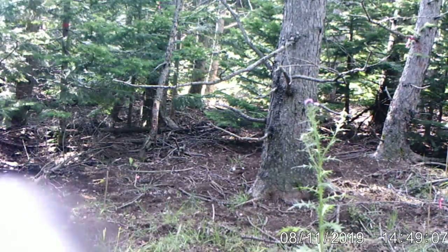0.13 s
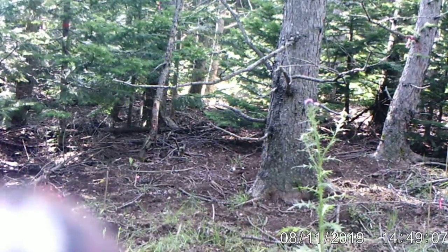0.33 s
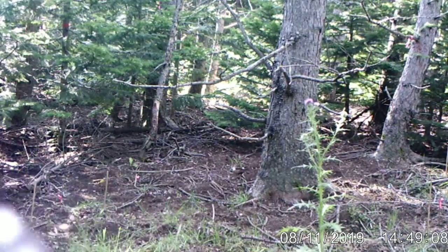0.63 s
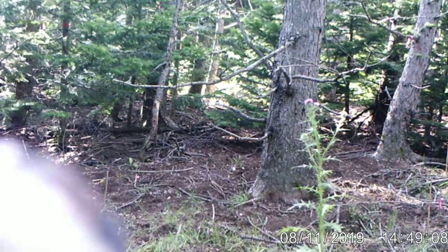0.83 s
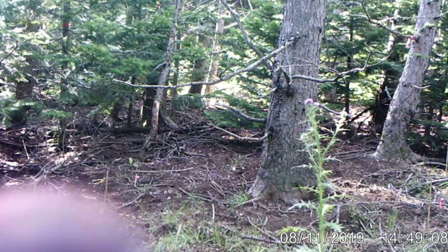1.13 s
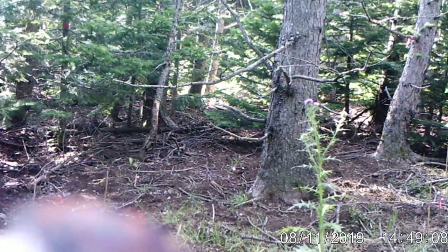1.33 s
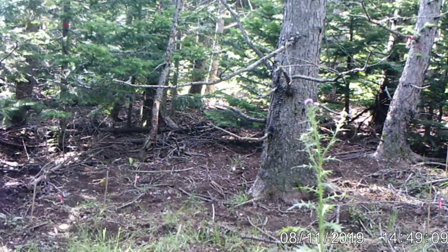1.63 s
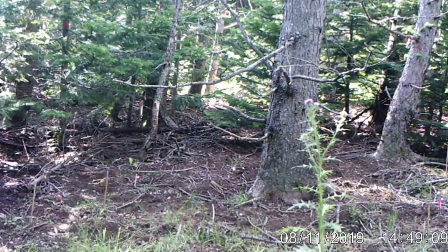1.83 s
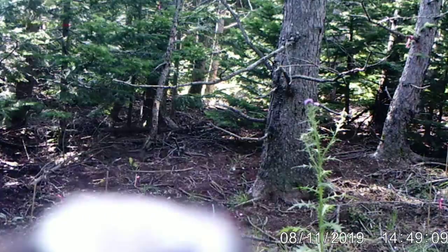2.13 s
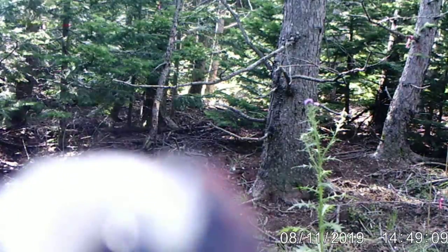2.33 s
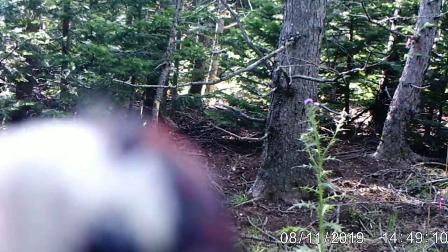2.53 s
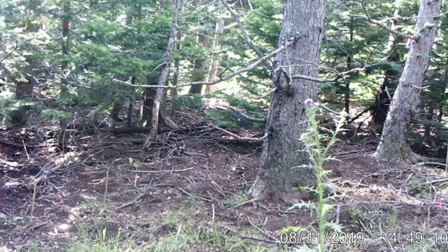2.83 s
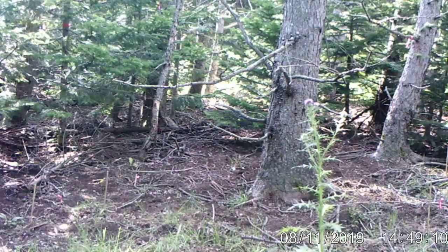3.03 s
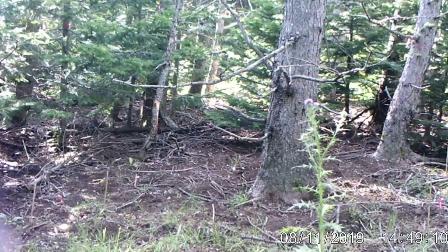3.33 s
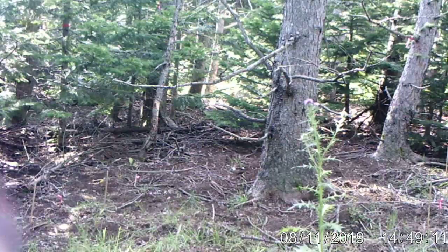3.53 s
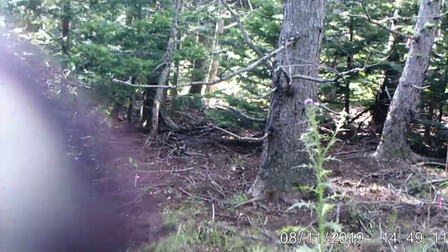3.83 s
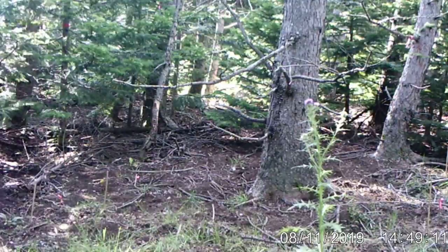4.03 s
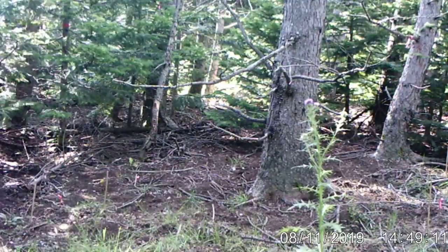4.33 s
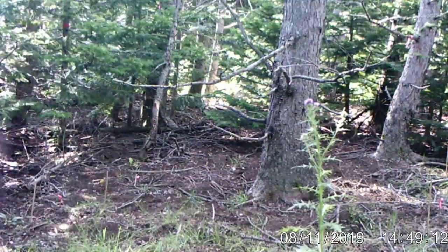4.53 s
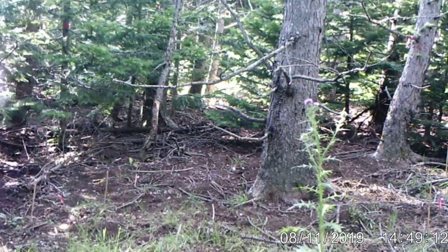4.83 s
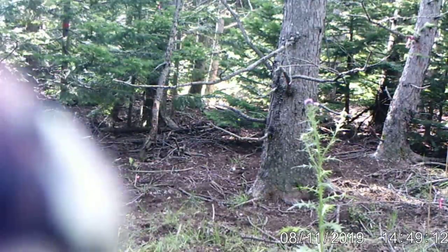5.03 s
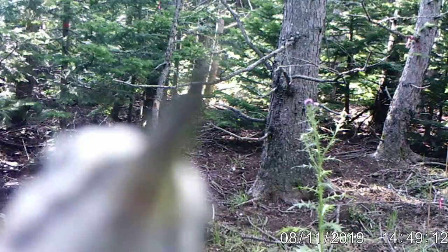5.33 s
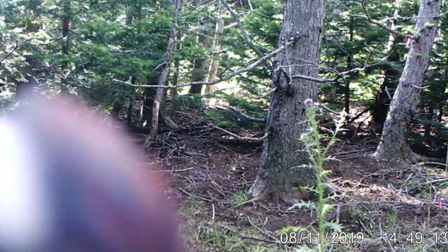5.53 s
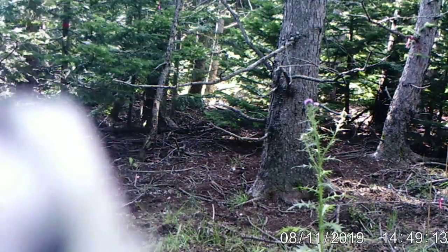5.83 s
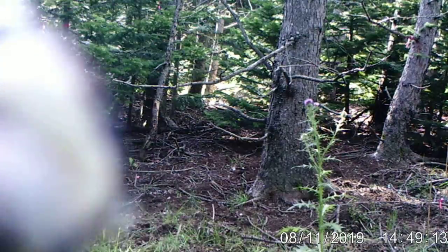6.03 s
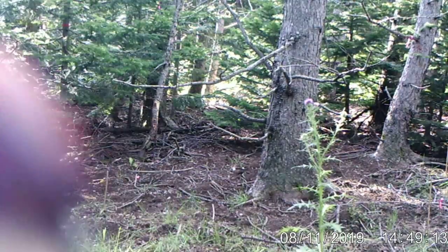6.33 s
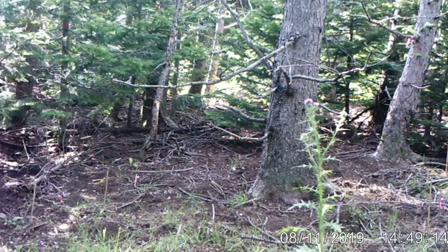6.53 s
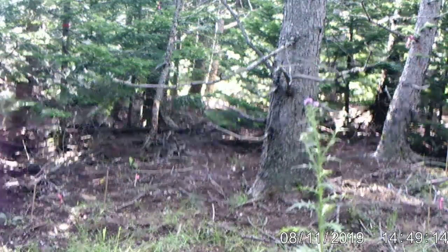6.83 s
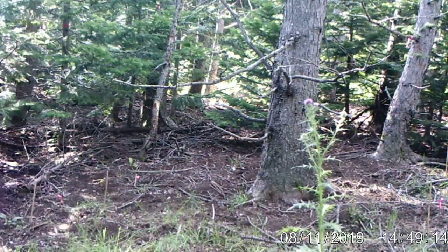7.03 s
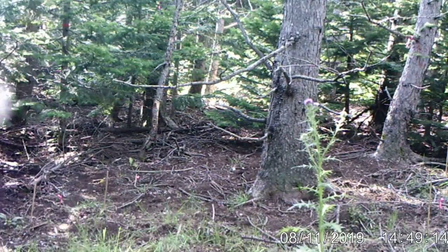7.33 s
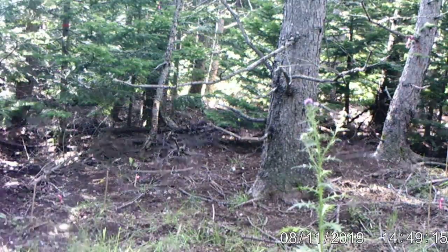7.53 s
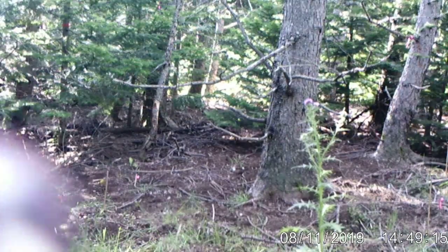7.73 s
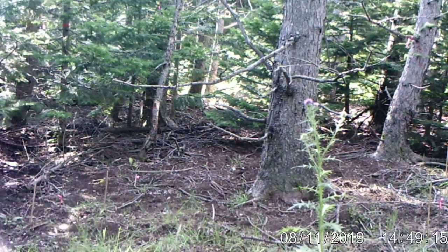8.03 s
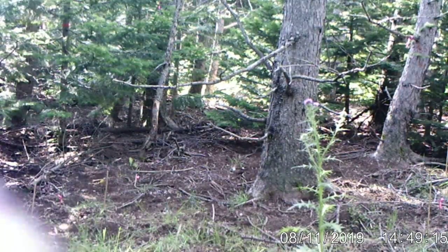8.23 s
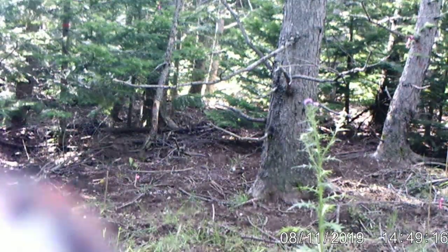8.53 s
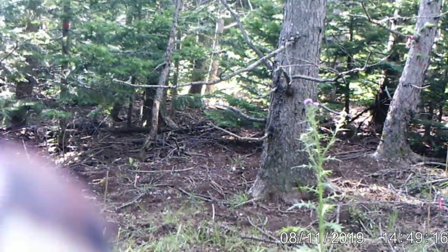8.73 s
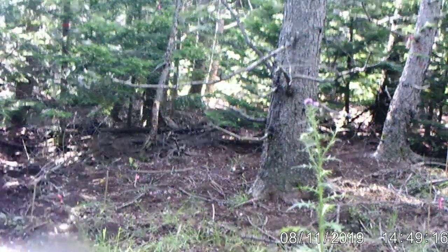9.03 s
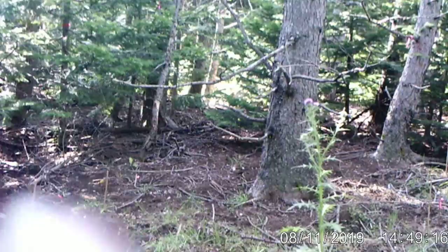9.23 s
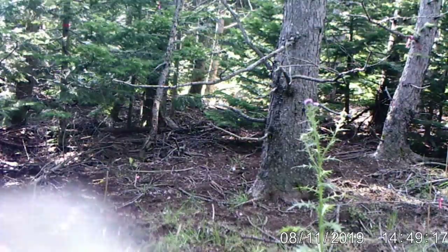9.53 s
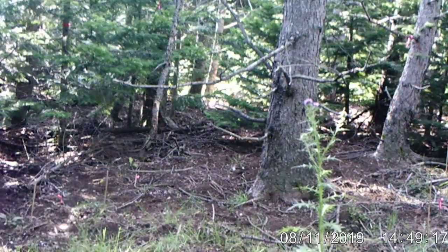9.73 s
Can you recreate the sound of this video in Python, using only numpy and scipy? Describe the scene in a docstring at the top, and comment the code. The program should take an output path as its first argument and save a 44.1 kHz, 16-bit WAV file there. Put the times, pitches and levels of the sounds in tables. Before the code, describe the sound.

A woodpecker hammers on a hollow plastic case right at the microphone, loud clipped knocks in uneven runs with rattling, light taps and claw scrapes.

```python
"""Quiet forest: a woodpecker on a plastic trail camera hammers on it in short, uneven runs, over a faint hiss.
Each peck rings the modes of the housing and clips at the microphone; the loose case rebounds and chatters.
Between pecks, light contacts of beak and claws ring the same modes.
Claw creaks, scrapes and bill wipes are trains of uneven slips, coloured by the plastic.
"""
import sys
import numpy as np
from scipy import signal
from scipy.fft import rfft, irfft
from scipy.io import wavfile

SR = 44100
rng = np.random.default_rng(int(sys.argv[2]) if len(sys.argv) > 2 else 0)


def dump_mix(stems):
    """Bounce the given channels to the path in sys.argv[1] as a 16-bit WAV at rate SR."""
    frames = np.atleast_2d(stems).T  # one column per channel
    limited = np.clip(frames, -1, 1)  # hard clip at full scale
    pcm = np.round(limited * 32767).astype(np.int16)
    wavfile.write(sys.argv[1], SR, pcm)


N = 436590
T_S = np.arange(SR // 5) / SR  # time after one contact

# Pecks: t/s, flex level/dB, knock centre f/Hz, crack level/dB, thump gain/dB, sway/dB, settle t/s
# sway: rocking of the case on its mount, 0 dB = full blow; settle: time at which rocking is halved
PECKS = [(0.1711, -11.5, 1350, -13.5, -27, 0.5, 0.061), (0.5233, -9.5, 1493, -12, -17, -2, 0.073),
         (0.713, -13.5, 1318, -13.5, -29, -1.5, 0.079), (1.446, -22.5, 1118, -18, -54, -12, 0.07),
         (2.0522, -13.5, 1530, -19, -22, -16, 0.08), (2.3783, -17, 1510, -23.5, -42, -33, 0.047),
         (2.7092, -13.5, 1410, -15, -16, -7.5, 0.065), (2.8684, -10, 1410, -11.5, -19.5, -5.5, 0.072),
         (3.1986, -13, 1030, -13.5, -6, -4, 0.16), (3.6739, -14.5, 1310, -13, -23, -11.5, 0.069),
         (3.8501, -13, 1410, -15, -28.5, 0, 0.079), (4.4307, -12.5, 1543, -22, -32, 0.5, 0.095),
         (4.6353, -10, 1500, -16.5, -25, 0.5, 0.14), (6.2509, -9.5, 1577, -15.5, -16, -14, 0.031),
         (6.2565, -11, 1627, -15, -16.5, -12.5, .037), (6.5123, -24.5, 1430, -25.5, -46, -38, 0.08),
         (6.6471, -16, 1500, -28.5, -44, -12, 0.1), (6.813, -11, 1450, -16.5, -19.5, -1.5, 0.081),
         (7.5096, -15.5, 1440, -19, -19.5, -3, .1), (7.685, -12.5, 1516, -18.5, -25, 1, 0.074),
         (8.0942, -9.5, 1090, -24.5, -13.5, -0.5, 0.084), (8.272, -8.5, 1581, -13, -36, -1.5, 0.097),
         (8.4433, -13, 1360, -18.5, -20.5, -0.5, 0.13), (8.8311, -12.5, 1530, -13.5, -29.5, 1, 0.11),
         (8.9868, -8, 1260, -20.5, -13, 1, 0.067), (9.158, -11.5, 1500, -19, -23, -4, 0.11),
         (9.5432, -11, 1444, -19, -14.5, -1, 0.1), (9.7058, -17, 1320, -21.5, -46, -4, 0.06)]
# Clearest light taps of beak and claws: t/s, knock level/dB, click level/dB
TAPS = [(0.164, -43, -40), (1.06, -37.5, -36.5), (1.89, -61, -52), (1.93, -55, -44), (2.011, -49, -50.5),
        (2.298, -28.5, -34.5), (2.662, -55.5, -48), (2.845, -65.5, -41.5), (3.175, -47.5, -26),
        (3.185, -41.5, -27.5), (3.25, -24, -30), (3.274, -45, -32), (3.292, -39, -17),
        (3.331, -34.5, -26.5), (3.342, -39, -34), (3.552, -46.5, -42), (3.574, -49, -31), (3.58, -32, -27),
        (4.069, -66, -53.5), (4.4, -48.5, -38), (4.425, -52, -33), (4.587, -47, -36), (4.624, -48, -29.5),
        (4.802, -65, -48.5), (5.028, -54, -44.5), (5.162, -64, -50.5), (5.546, -29.5, -37.5),
        (6.213, -53, -41.5), (6.229, -52.5, -38), (6.302, -33, -39), (6.347, -57, -47.5),
        (6.41, -68, -52.5), (6.628, -58, -32), (6.797, -49.5, -25), (7.637, -41, -25.5),
        (7.677, -34.5, -27), (7.796, -31.5, -23.5), (7.827, -31, -23), (7.891, -56, -37.5),
        (7.985, -40, -30.5), (8.973, -46, -27), (9.135, -71, -39.5), (9.509, -49, -37),
        (9.672, -46.5, -28.5)]
# Claws dragging over the case: t/s, length/s, body drive/dB, rasp drive/dB
SCRAPES = [(0.662, 0.01, -45.5, -49), (0.995, 0.11, -52, -54.5), (1.114, 0.024, -45, -46),
           (3.216, 0.11, -42.5, -32.5), (3.288, 0.025, -62, -27), (3.409, 0.031, -49.5, -52),
           (3.572, 0.015, -34, -42), (3.598, 0.022, -48, -36.5), (6.7, 0.098, -53.5, -67),
           (7.615, 0.05, -37, -29), (7.692, 0.062, -57, -23), (7.773, 0.1, -58, -32.5),
           (7.904, 0.016, -39, -47), (7.921, 0.2, -57, -46)]
# Spells of shifting grip: start t/s, end t/s, drive/dB
SHUFFLES = [(1.522, 1.574, -56), (3.353, 3.464, -57), (3.535, 3.676, -58.5), (4.933, 5.167, -57.5),
            (7.218, 7.25, -50.5)]
# Bending modes of the housing walls, before detuning and damping: f/Hz, level/dB, t60/s
WALL_MODES = [(844, -4, .028), (922, -9.5, 0.055), (1072, -4, 0.025), (1213, -6.5, 0.026),
              (1240, -10.5, .018), (1457, 1, 0.014), (1660, 2, .03), (1870, -10, 0.004)]
# Stiff modes of the front plate, before detuning and damping: f/Hz, level/dB, t60/s
PLATE_MODES = [(2198, 1.5, 0.028), (2823, -1, 0.014), (3010, 1.5, 0.0023), (3090, -0.5, 0.019),
               (3180, -9.5, 0.054), (3480, 1.5, 0.01), (4120, -15.5, 0.007), (3694, -2.5, 0.014),
               (4500, -3, 0.058), (5300, -5, 0.035), (4810, -4, 0.031)]
# Long resonances of the back shell, fed by blows and loose parts: f/Hz, width/Hz, level/dB
SHELL_MODES = [(230, 61, -7), (384, 22, -3.5), (1252, 14, -7.5), (2070, 110, -1.5), (3070, 7, -10),
               (4480, 7, -11), (4950, 7, -13)]
# Case falling back onto its mount, before scatter and settling: delay t/s, level at 0 dB sway/dB
BOUNCES = [(0.0225, -18), (0.035, -31), (0.05, -32.5), (0.056, -35), (0.068, -32.5), (0.081, -40.5),
           (0.094, -37)]
# Colour of the chattering case: f/Hz, relative level/dB
RATTLE_COLOUR = [(60, -32.5), (200, -19.5), (290, -23), (410, -5.5), (650, -13.5), (900, 2), (1400, 1.5),
                 (2080, 3), (2600, 1), (3900, -2), (4550, 1), (5100, -9), (6000, -19.5)]
# Colour of the loose parts inside: f/Hz, relative level/dB
CRUNCH_COLOUR = [(60, -12), (500, -4), (900, -1), (1600, 4.5), (2500, -0.5), (3800, 0), (4500, 3.5),
                 (6000, -14)]
# Colour of the hollow body under rubbing: f/Hz, relative level/dB
BODY_COLOUR = [(60, -23.5), (600, -23), (950, -18.5), (1400, -9), (1650, 12.5), (1900, -7), (2600, -12),
               (6000, -52.5)]
# Colour of beak or claw on plastic: f/Hz, relative level/dB
RASP_COLOUR = [(100, -40), (1200, -24), (2200, -13), (3500, -9), (4150, 3), (4550, 4), (4900, -6),
               (6000, -13)]
# Colour of forest air and microphone noise: f/Hz, relative level/dB
HISS_COLOUR = [(25, -3), (80, -4.5), (250, -5), (420, -3), (800, -3), (1600, -4.5), (3000, -6.5),
               (4400, -9), (5300, -10.5), (6200, -9)]

HISS_DB = -59.5  # before waver and low-pass
GRIP_LEAD_S, GRIP_HOLD_S, GRIP_DRIVE_DB = 0.062, 0.055, -58.5
STRAY_PER_S, STRAY_DB, STRAY_SPREAD_DB = 2.5, -58.5, 6
BOUNCE_DB_PER_SWAY_DB, BOUNCE_JITTER, BOUNCE_SCATTER_DB = 1.4, 0.03, 1  # jitter: share of delay
BUZZ_DB, BUZZ_T60_S = -31, 0.25  # at 0 dB sway, before settling
CRUNCH_DB, CRUNCH_DB_PER_SWAY_DB, CRUNCH_T60_S = -9, 0.38, 0.061
WIPE_START_S, WIPE_PERIOD_S, WIPE_STROKE_S = 5.6325, 0.0443, 0.025
WIPE_DRIVE_DB, WIPE_SWELL_S, WIPE_RETURN_DB, WIPE_BODY_DB = -45, 0.15, -8, -4
MIC_HZ, TOP_HZ = 5434, 16300
CLIP_LEVEL, OFFSET = 0.725, 0.0096


def amp(db):
    """Decibels to gain."""
    return 10 ** (np.asarray(db) / 20)


def fade(t60_s):
    """Exponential decay, 60 dB in t60_s."""
    return np.exp(-np.log(1000) * T_S / max(t60_s, 1e-3))


def attack_level(x, db):
    """Scale a contact to this rms over its first 6 ms."""
    attack = x[:SR * 6 // 1000]
    return x * amp(db) / np.sqrt(np.mean(attack ** 2))


def add(out, start_s, x):
    """Mix x into out from start_s on."""
    i = max(int(start_s * SR), 0)
    n = max(min(len(x), len(out) - i), 0)
    out[i:i + n] += x[:n]


def response(colour, size=1024):
    """Minimum-phase impulse response of unit energy with the given colour."""
    hz, db = np.transpose(colour)
    f_hz = np.maximum(np.arange(size // 2 + 1) * SR / size, 1)
    gain = amp(np.interp(np.log(f_hz), np.log(hz), db))
    cepstrum = irfft(np.log(gain))
    # folding the cepstrum makes the response causal
    cepstrum[1:size // 2] *= 2
    cepstrum[size // 2 + 1:] = 0
    h = irfft(np.exp(rfft(cepstrum)))
    return h / np.sqrt(np.sum(h ** 2))


def through(x, h):
    """Convolve x with an impulse response, keeping its length."""
    return signal.oaconvolve(x, h)[:len(x)]


def resonate(x, hz, width_hz):
    """One resonance, gain 1 at its centre."""
    return signal.lfilter(*signal.iirpeak(hz, hz / width_hz, fs=SR), x + 1e-18)


def swell(start_s, length_s):
    """Smooth rise and fall over the stretch, rms 1 within it."""
    out = np.zeros(N)
    add(out, start_s, np.hanning(max(int(length_s * SR), 8)) / np.sqrt(3 / 8))
    return out


def grains(n, rate_per_s, spread_db):
    """Tiny slips of very uneven size over a weak noise floor, overall rms 1."""
    size = amp(spread_db * np.minimum(rng.exponential(size=n), 4))
    slips = (rng.random(n) < rate_per_s / SR) * size * rng.choice([-1, 1], n)
    x = slips + 0.023 * rng.standard_normal(n)
    return x / np.sqrt(np.mean(x ** 2))


def hiss(waver_db=1.45):
    """Still forest air and microphone noise: coloured noise, barely wavering, low-passed."""
    knots = rng.standard_normal(40)
    waver = amp(waver_db * np.interp(np.arange(N), np.linspace(0, N, len(knots)), knots))
    air = through(rng.standard_normal(N), response(HISS_COLOUR))
    low_pass = signal.butter(14, 5250, fs=SR, output="sos")
    return amp(HISS_DB) * waver * signal.sosfilt(low_pass, air)


def spots(slips, width_hz=500):
    """A claw slides from spot to spot, favouring other front-plate modes every 8 ms."""
    hold = SR // 125
    shares = rng.standard_normal((len(PLATE_MODES), N // hold + 1))
    out = np.zeros(N)
    for (hz, _, _), share in zip(PLATE_MODES, shares):
        out += resonate(slips * np.repeat(share, hold)[:N], hz, width_hz)
    return out


def rub(slips, body_gain, rasp_gain, rasp_db=-2, spots_db=-2, rattle_db=-14):
    """Slips on plastic excite the hollow body, a bright shifting rasp and the loose case."""
    bright = amp(rasp_db) * response(RASP_COLOUR) + amp(rattle_db) * response(RATTLE_COLOUR)
    body = through(slips * body_gain, response(BODY_COLOUR))
    scratch = slips * rasp_gain
    return body + through(scratch, bright) + amp(spots_db) * spots(scratch)


def grip(body_db=-8):
    """Sparse claw creaks: the grip tightens before every peck and shifts with the feet."""
    effort = np.zeros(N)
    for peck_s, *_ in PECKS:
        add(effort, peck_s - GRIP_LEAD_S, np.full(int(GRIP_HOLD_S * SR), amp(GRIP_DRIVE_DB)))
    for start_s, end_s, db in SHUFFLES:
        add(effort, start_s, np.full(max(int((end_s - start_s) * SR), 1), amp(db)))
    slips = grains(N, rate_per_s=600, spread_db=5)
    return rub(slips, amp(body_db) * effort, effort, rasp_db=-3, spots_db=-0.5, rattle_db=-14)


def ring(modes, scatter_db, rise_s, centre_hz=None, focus_db=9):
    """Modes struck at a new spot: shares and tuning scatter, modes near centre_hz are favoured."""
    hz, db, t60_s = np.transpose(modes)
    share, detune, side = rng.standard_normal((3, len(hz)))
    db = db + scatter_db * share
    if centre_hz:
        octaves_off = np.abs(np.log2(hz / centre_hz))
        db = db - focus_db * np.minimum(octaves_off, 1)
    t = T_S[:len(T_S) // 2]
    tones = np.sin(2 * np.pi * np.outer(hz * (1 + 0.019 * detune), t))
    decays = np.exp(-np.log(1000) * np.outer(1 / t60_s, t))
    struck = (np.sign(side) * amp(db)) @ (tones * decays)
    return np.pad(struck * (1 - np.exp(-t / rise_s)), (0, len(T_S) - len(t)))


def tap(knock_db, click_db, grit_db=-8):
    """A light contact rings walls and plate with a speck of grit; the case stays at rest."""
    walls = ring(WALL_MODES, scatter_db=0.5, rise_s=0.0004, centre_hz=1630, focus_db=12.5)
    knock = walls * fade(0.12)
    plate = ring(PLATE_MODES, scatter_db=2.5, rise_s=0.0006, centre_hz=4400, focus_db=18)
    plate = attack_level(plate * fade(0.013), 0)
    grit = through(rng.standard_normal(len(T_S)) * fade(0.017), response(RASP_COLOUR))
    click = plate + attack_level(grit, grit_db)
    return attack_level(knock, knock_db) + attack_level(click, click_db)


def taps(stray_knock_db=-11, count=30):
    """Clear taps of beak and claws, plus faint claw ticks at random moments."""
    out = np.zeros(N)
    for tap_s, knock_db, click_db in TAPS:
        add(out, tap_s, tap(knock_db, click_db))
    stray_s = np.cumsum(rng.exponential(1 / STRAY_PER_S, count))
    stray_db = STRAY_DB + STRAY_SPREAD_DB * rng.standard_normal(count)
    for tick_s, db in zip(stray_s, stray_db):
        add(out, tick_s, tap(db + stray_knock_db, db))
    return out


def flex(hz, swell_s=0.00085):
    """The wall gives under the beak and swings back: a few cycles that swell and die."""
    return np.sin(2 * np.pi * hz * T_S) * T_S * np.exp(-T_S / swell_s)


def bounce(colour, t60_s, spot_db=4):
    """One brief fall of the loose case; each landing spot has its own resonance."""
    n = len(T_S) // 2
    envelope = fade(t60_s) * (1 - np.exp(-T_S / 0.00075))
    x = through(rng.standard_normal(n), colour) * envelope[:n]
    spot = signal.lfilter(*signal.iirpeak(rng.uniform(1100, 5200), 6, fs=SR), x)
    return np.pad(attack_level(x + amp(spot_db) * spot, 0), (0, len(T_S) - n))


def rocking(sway_db, settle_s, colour):
    """The shoved case bounces and buzzes on its mount, louder with sway, until it seats itself."""
    jolts = grains(len(T_S), rate_per_s=800, spread_db=3.5)
    buzz = through(jolts, colour) * fade(BUZZ_T60_S)
    out = np.zeros(len(T_S))
    add(out, BOUNCES[0][0], amp(BUZZ_DB + sway_db) * buzz)
    scatter = rng.standard_normal((len(BOUNCES), 2))
    for (delay_s, db), (late, size) in zip(BOUNCES, scatter):
        gain = amp(db + BOUNCE_DB_PER_SWAY_DB * sway_db + BOUNCE_SCATTER_DB * size)
        fall = bounce(colour, t60_s=0.016, spot_db=1)
        add(out, delay_s * (1 + BOUNCE_JITTER * late), gain * fall)
    return out / (1 + (T_S / settle_s) ** 7)


def shell(x):
    """The back shell rings along with whatever knocks or rattles against it."""
    return sum(amp(db) * resonate(x, hz, width_hz) for hz, width_hz, db in SHELL_MODES)


def pecks(modes_db=-2, push_s=0.0016, tip_db=-3, tip_t60_s=0.019, shell_db=-10):
    """The beak flexes and rings the housing; the shoved case falls back and chatters."""
    blows, loose = np.zeros(N), np.zeros(N)
    rattle, crunch, rasp = response(RATTLE_COLOUR), response(CRUNCH_COLOUR), response(RASP_COLOUR)
    for peck_s, knock_db, hz, crack_db, thump_db, sway_db, settle_s in PECKS:
        walls = ring(WALL_MODES, scatter_db=3.0, rise_s=0.0024, centre_hz=hz, focus_db=9) * fade(0.06)
        knock = attack_level(flex(hz), knock_db) + attack_level(walls, knock_db + modes_db)
        plate = attack_level(ring(PLATE_MODES, scatter_db=4.0, rise_s=0.0006), 0)
        tip = through(rng.standard_normal(len(T_S)) * fade(tip_t60_s), rasp)
        crack = attack_level(plate + attack_level(tip, tip_db), crack_db)
        # the push of the beak squeezes the air in the case
        push = np.sin(np.pi * np.minimum(T_S / push_s, 1))
        thump = amp(thump_db) * push * fade(0.017)
        add(blows, peck_s, knock + crack + thump)
        # loose parts inside are shaken up and buzz on
        shaking = amp(CRUNCH_DB + CRUNCH_DB_PER_SWAY_DB * sway_db) * fade(CRUNCH_T60_S)
        shaking = shaking * (1 - np.exp(-T_S / 0.0026))
        parts = through(grains(len(T_S), rate_per_s=2700, spread_db=2.0) * shaking, crunch)
        add(loose, peck_s, parts + rocking(sway_db, settle_s, rattle))
    return blows + loose + shell(loose + amp(shell_db) * blows)


def scrapes():
    """A dragging claw sticks and slips densely, swelling and fading."""
    body = sum(amp(body_db) * swell(start_s, length_s) for start_s, length_s, body_db, _ in SCRAPES)
    rasp = sum(amp(rasp_db) * swell(start_s, length_s) for start_s, length_s, _, rasp_db in SCRAPES)
    slips = grains(N, rate_per_s=1100, spread_db=4.3)
    return rub(slips, body, rasp)


def wiping(count=7):
    """Even bill strokes, growing to full force, with short, light returns between them."""
    effort = np.zeros(N)
    for k in range(count):
        start_s = WIPE_START_S + k * WIPE_PERIOD_S
        stroke = swell(start_s, WIPE_STROKE_S)
        if k < count - 1:
            back = swell(start_s + WIPE_STROKE_S, WIPE_PERIOD_S - WIPE_STROKE_S)
            stroke = stroke + amp(WIPE_RETURN_DB) * back
        force = min((k + 1) * WIPE_PERIOD_S / WIPE_SWELL_S, 1)
        effort += amp(WIPE_DRIVE_DB) * force * stroke
    slips = grains(N, rate_per_s=1900, spread_db=4.0)
    return rub(slips, amp(WIPE_BODY_DB) * effort, effort, rasp_db=-7, spots_db=1, rattle_db=-10.5)


def scene():
    """All sources sum at one microphone inside the housing."""
    return (hiss() + grip() + taps() + pecks() + scrapes() + wiping())[None]


def record(dry):
    """Narrow-band recorder, slightly off centre: strong pecks clip, then the top is low-passed."""
    mic = signal.butter(10, MIC_HZ, fs=SR, output="sos")
    band_limit = signal.ellip(10, 0.2, 80, 6000, fs=SR, output="sos")
    narrow = signal.sosfilt(band_limit, signal.sosfilt(mic, dry)) + OFFSET
    clipped = np.clip(narrow, -CLIP_LEVEL, CLIP_LEVEL)
    return signal.fftconvolve(clipped, signal.firwin(201, TOP_HZ, fs=SR)[None], mode="same")


dry = scene()
out = record(dry)
dump_mix(out)
```